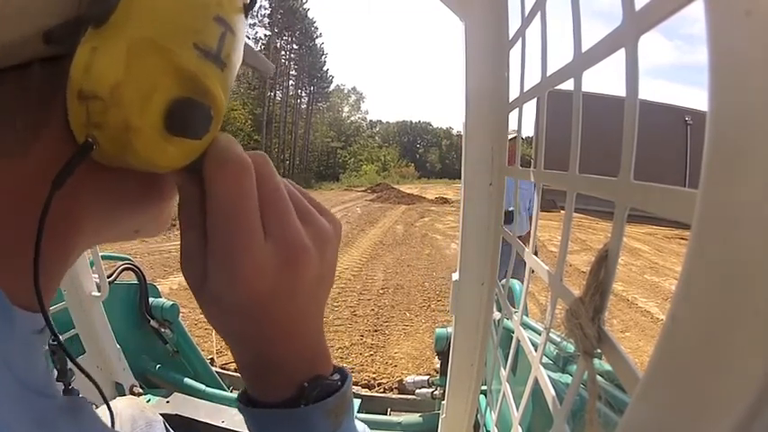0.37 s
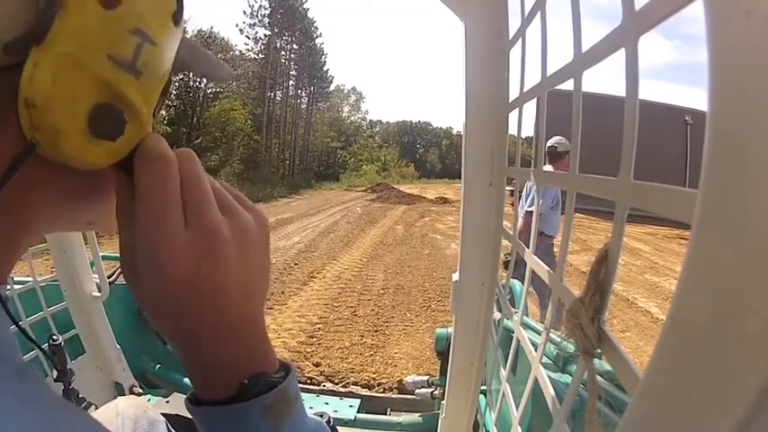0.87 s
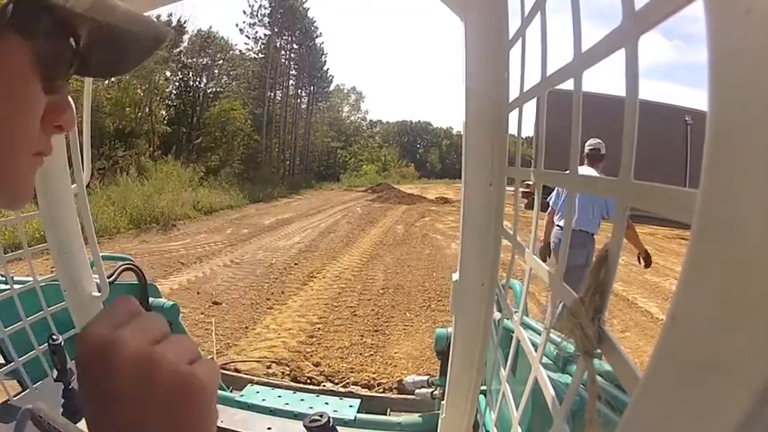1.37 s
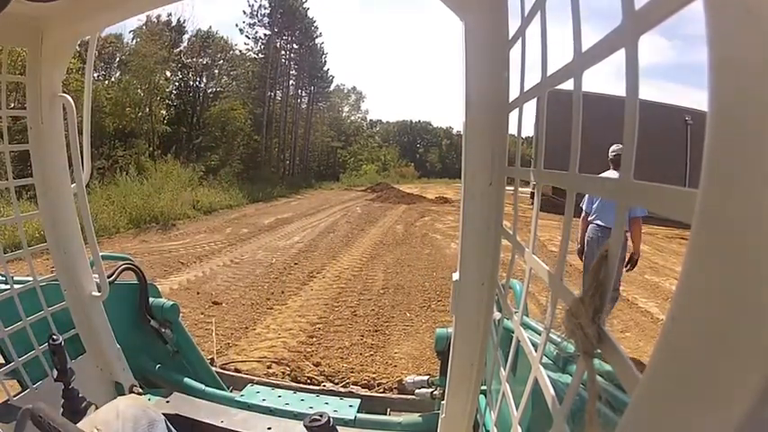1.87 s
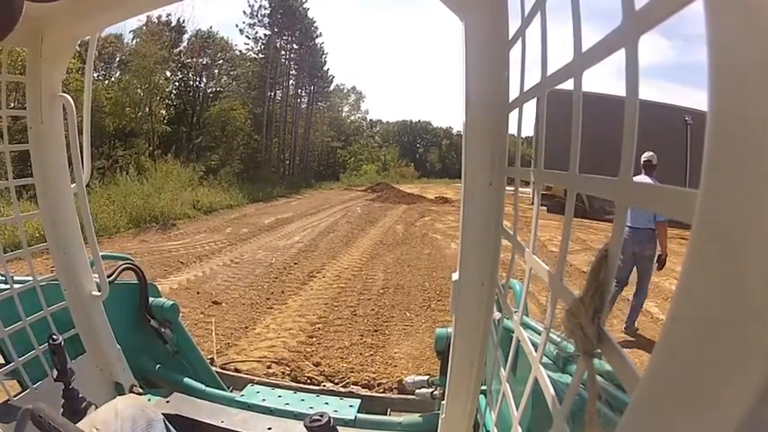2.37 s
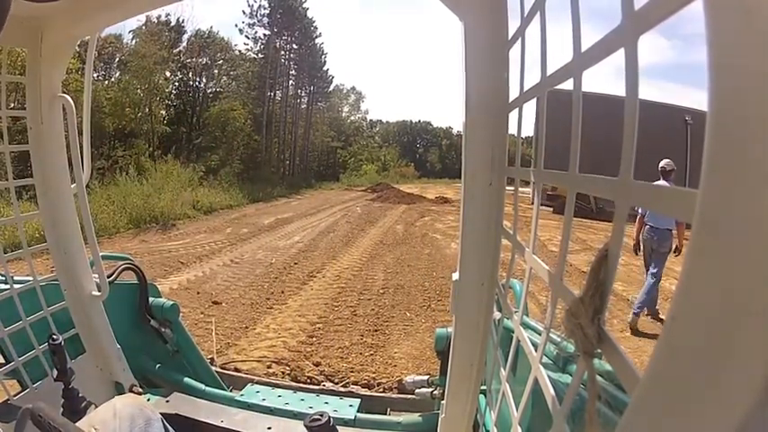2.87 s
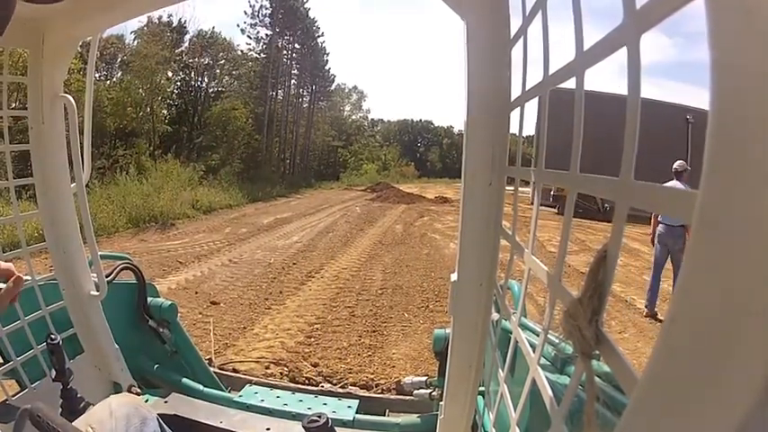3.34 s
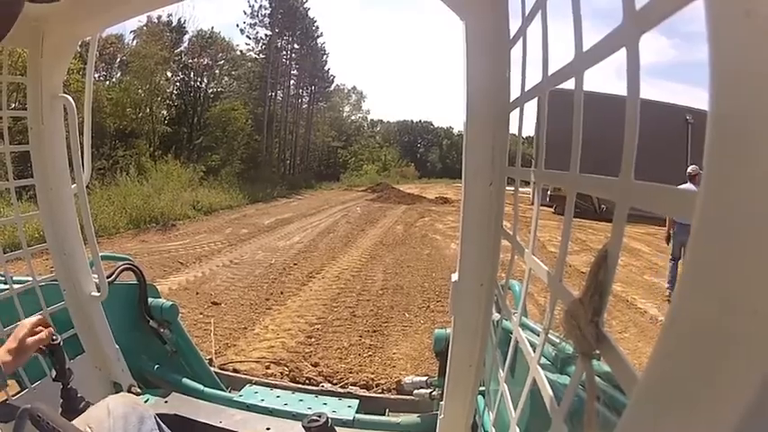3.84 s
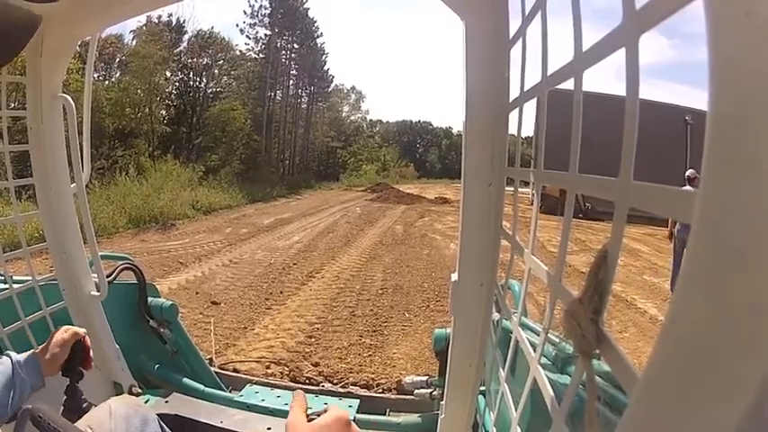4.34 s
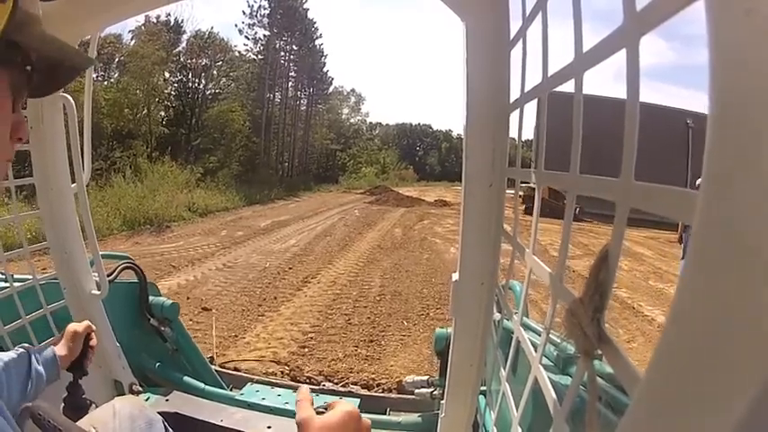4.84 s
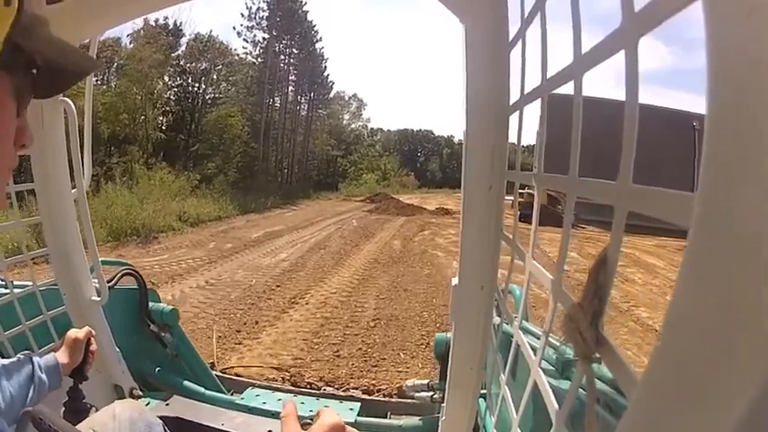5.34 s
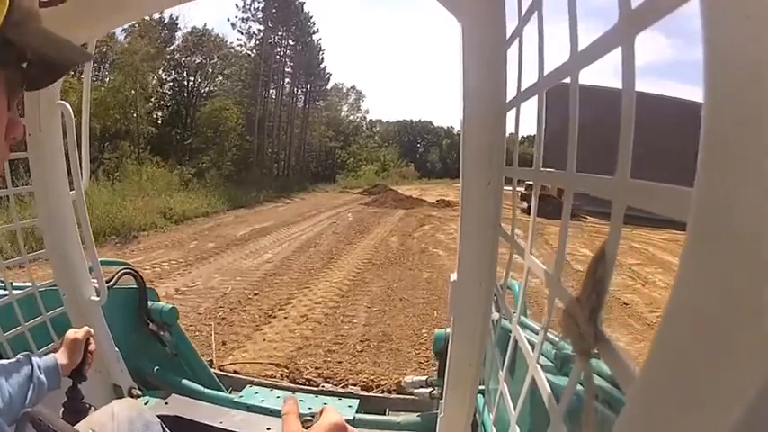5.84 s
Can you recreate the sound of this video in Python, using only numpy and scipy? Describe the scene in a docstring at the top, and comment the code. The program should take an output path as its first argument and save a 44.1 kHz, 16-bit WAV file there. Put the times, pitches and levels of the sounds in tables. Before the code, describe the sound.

Heard from the operator's shoulder inside an open, caged loader cab on a dirt site. From 0 to about 3.1 seconds a four-cylinder diesel idles evenly: a low lumpy throb around 36 firings a second, dry metallic block clatter, soft regular injector ticks and faintly humming panels; a tiny rattle comes near 2.6. At about 3.2 the throttle opens with a short hydraulic groan, and by 3.6 the engine is at working speed. A deep boom near 60 hertz dominates, fluttering, dipping around 3.9 and 4.15, then surging back. Thin pump whines appear from 4.4 to 5.2 as floor, roof and guards shudder. From about 5.1 the drive loads up: gritty knocks, a faint moan, more ringing steel and, after 5.5, a higher engine pitch, still roaring at the end near 6. The mono microphone overloads, the limiter ducks other sounds, and coarse hiss rides on top.

```python
"""Inside the open steel cab of a small tracked loader: a four-cylinder diesel idles, then is revved.
Crank orders shake the cab as sines; the firing rate climbs into the cab's boom, a gliding sine.
Filtered noise gives block clatter, injector ticks and ringing steel; pumps whine as gliding sines, and
scattered knocks sound the drive as it takes up load. A limiter holds the boom and ducks all else;
coarse sampling adds mirror copies of the bass that hiss in the treble."""
import sys
import numpy as np
from scipy import signal
from scipy.fft import rfft, irfft
from scipy.io import wavfile
from scipy.ndimage import uniform_filter1d

SR = 44100
rng = np.random.default_rng(int(sys.argv[2]) if len(sys.argv) > 2 else 0)


def log_audio(samples):
    """Write samples as a 16-bit WAV file to the path given in sys.argv[1]."""
    # one column per channel
    frames = np.atleast_2d(samples).T
    # limit to full scale, then quantise
    limited = np.clip(frames, -1, 1)
    pcm = np.round(limited * 32767).astype(np.int16)
    wavfile.write(sys.argv[1], SR, pcm)


def amplitude_ratio(level_db):
    """Convert a level in decibels to the matching linear amplitude (field) ratio."""
    exponent = np.asarray(level_db, float) / 20
    return 10 ** exponent


N = 262836
T = np.arange(N) / SR  # time in seconds


def level(x, db):
    """Normalization: scale a signal to an rms level in dB."""
    return x * amplitude_ratio(db) / np.sqrt(np.mean(x ** 2))


def noise():
    """White noise: equal power at all frequencies."""
    return rng.standard_normal(N)


def curve(table, column=1):
    """Linear interpolation: one column of a table over time."""
    rows = np.array(table, float)
    return np.interp(T, rows[:, 0], rows[:, column])


def colour(x, points):
    """Spectral shaping: gain between (Hz, dB) points on a log-frequency axis, -90 dB outside them."""
    hz, db = np.transpose(points)
    f = np.arange(N // 2 + 1) * SR / N + 1
    gain_db = np.interp(np.log(f), np.log(hz), db, -90, -90)
    return irfft(rfft(x) * amplitude_ratio(gain_db), N)


def ring(x, modes):
    """Modal resonance: the powers of the modes add; squaring each curve deepens the valleys between them."""
    f = np.arange(N // 2 + 1) * SR / N + 1
    power = sum(amplitude_ratio(2 * db) / (1 + ((f - hz * hz / f) / width) ** 2) ** 2 for hz, width, db in modes)
    return irfft(rfft(x) * np.sqrt(power), N)


def walk(rate):
    """Slow random modulation: levels held 1 / rate seconds, with slewed steps; spread near 1."""
    k = int(SR / rate)
    held = np.repeat(rng.standard_normal(N // k + 1), k)
    return uniform_filter1d(held, k)[:N]


def tone(hz, gain):
    """Frequency modulation: a sine whose phase is the running sum of its pitch; gain is rms."""
    return gain * np.sqrt(2) * np.sin(2 * np.pi * np.cumsum(hz) / SR)


def swell(start_s, hold_s, db, attack_s=0.026, release_s=0.067):
    """Amplitude envelope: a gain that rises, holds and falls away."""
    corners_s = [0, attack_s, attack_s + hold_s, attack_s + hold_s + release_s]
    return amplitude_ratio(db) * np.interp(T - start_s, corners_s, [0, 1, 1, 0])


# Engine speed. Each row: time in seconds, firing rate in Hz.
ENGINE_SPEED = [(0.0, 35.81), (3.17, 35.66), (3.3, 35.5), (3.45, 49.64), (3.65, 61.7), (3.85, 63.3),
                (4.15, 63.05), (4.45, 63.8), (4.8, 60.46), (5.2, 60.67), (5.5, 65.24), (5.7, 70.88),
                (5.96, 69.6)]


def crankshaft(first_tick_s=0.127):
    """Four-stroke kinematics: four firings make one cycle; cycle 0 falls on first_tick_s."""
    firing_hz = curve(ENGINE_SPEED)
    firings = np.cumsum(firing_hz) / SR - firing_hz[0] * first_tick_s
    return firing_hz, firings / 4


# Idle crank orders. Each row: multiple of the four-stroke cycle rate, rms level in dB before it wavers.
IDLE_LINES = [(4, -21.5), (5, -64), (6, -36), (7, -13.5), (8, -25), (9, -33), (10, -33.5), (11, -29),
              (12, -28.5), (16, -21.5), (19, -47), (20, -16), (24, -35.5), (27, -65), (28, -32),
              (29, -30.5), (30, -32), (31, -69), (32, -46), (40, -35.5), (44, -41), (46, -46.5),
              (52, -46.5), (58, -49.5), (60, -43.5)]


def idle_lines(cycle, idle, lag=.3, spread=.013):
    """Harmonic excitation: steady crank orders are sines locked to the cycle, phases varying with order."""
    total = 0
    for k, db in IDLE_LINES:
        phase = k * (cycle - lag) + spread * k * k
        total = total + np.sqrt(2) * amplitude_ratio(db + 1.85 * walk(1.41)) * np.sin(2 * np.pi * phase)
    return idle * total


# The boom's course. Each row: time in seconds, pitch in Hz, rms level in dB before dropouts and limiter.
BOOM_COURSE = [(3.17, 63.16, -33), (3.23, 59.5, -14), (3.29, 54.2, -26), (3.33, 53.87, -2),
               (3.355, 53.7, 7), (3.55, 57.2, 5), (3.73, 61.65, 4.5), (3.81, 62.4, -2), (3.88, 61.85, -4),
               (3.94, 61.73, -4), (4.03, 62.3, 6.5), (4.08, 61.3, -3), (4.15, 60.17, -15),
               (4.25, 60.02, 3.5), (4.33, 62.43, 2), (4.39, 64.4, -8), (4.5, 61.6, 3), (4.62, 61.36, -0.5),
               (4.87, 60.7, 0), (5.14, 60.17, 1), (5.24, 59.6, 1.5), (5.55, 59.36, 2.5), (5.7, 60.6, -0.5),
               (5.8, 60.9, -1), (5.96, 57.1, 0.5)]
# Brief dropouts of the boom. Each row: time of the centre in seconds, depth in dB.
BOOM_DROPOUTS = [(3.39, -4), (3.85, -21), (3.91, -11), (4.37, -12), (4.53, -5), (4.61, -8), (4.77, -5),
                 (5.48, -5.5), (5.62, -12), (5.74, -14), (5.85, -24)]


def boom(work, dropout_s=0.015):
    """Cavity excitation: the firing drives the cab air in one tone, which now and then drops out."""
    lost_db = sum(db * np.exp(-((T - s) / dropout_s) ** 2) for s, db in BOOM_DROPOUTS)
    return tone(curve(BOOM_COURSE), work * amplitude_ratio(curve(BOOM_COURSE, column=2) + lost_db))


# Broad spectrum of the clatter. Each row: frequency in Hz, relative gain in dB.
CLATTER_SPECTRUM = [(500, -19), (700, -8.5), (1200, -0.5), (1700, 1.5), (2500, -11), (2800, -24),
                    (3600, -14), (4400, -24.5), (5300, -20), (5700, -30), (5950, -20.5)]
# Resonances of the engine block. Each row: frequency in Hz, width in Hz, relative gain in dB.
BLOCK_MODES = [(715, 14.8, 4.5), (807, 17, 5), (890, 290, -7.5), (1084, 44, -1), (1216, 71, 0),
               (1407, 18, 2), (1475, 16, 9.5), (1651, 39, -1.5), (1860, 31, -1), (2060, 200, -6.5),
               (2270, 91, 1.5), (2428, 340, -6), (2956, 82, -10), (3020, 56, -6), (3520, 63, -14)]


def clatter(cycle, work, repeat=0.38, gate=0.072, modes_db=-1.5, flicker_db=0.84, hiss_drop_db=2):
    """Impact excitation: valves and pistons knock the block, partly alike each cycle, swelling at firings."""
    pattern = rng.standard_normal(2048)
    same = pattern[(cycle % 1 * len(pattern)).astype(int)]
    knocks = repeat * same + (1 - repeat) * noise()
    knocks = knocks * (1 + gate * np.cos(2 * np.pi * (4 * cycle - .1)))
    knocks = knocks * amplitude_ratio(flicker_db * walk(30))
    # at working speed the hiss drops against the block modes
    hiss = amplitude_ratio(-hiss_drop_db * work) * level(colour(knocks, CLATTER_SPECTRUM), 0)
    modes = level(ring(knocks, BLOCK_MODES), modes_db)
    return level(hiss + modes, 0)


# Spectrum of an injector tick. Each row: frequency in Hz, relative gain in dB.
TICK_SPECTRUM = [(2500, -5), (3200, 1), (4000, -3.5), (5200, -7), (5700, -1.5), (5950, -18)]


def ticks(cycle, firing_hz, decay_s=0.015, second_db=-10, fresh=0.6):
    """Periodic impulses: one injector ticks each cycle, its partner more softly half a cycle on."""
    turn = np.floor(2 * cycle).astype(int)  # half cycles
    # + 4 keeps the index positive before the first tick
    size = amplitude_ratio(1.2 * rng.standard_normal(400)[turn + 4] + second_db * (turn % 2))
    since_s = (2 * cycle % 1) * 2 / firing_hz
    # a common shape makes the ticks much alike
    alike = rng.standard_normal(4000)[(since_s * SR).astype(int)]
    bursts = size * np.exp(-since_s / decay_s) * (alike + fresh * noise())
    return level(colour(bursts, TICK_SPECTRUM), 0)


def rattle(start_s, length_s, db):
    """Transient noise: one burst in the colour of the ticks."""
    corners_s = [0, .002, length_s, length_s + 0.012]
    gain = amplitude_ratio(db) * np.interp(T - start_s, corners_s, [0, 1, 1, 0])
    return gain * level(colour(noise(), TICK_SPECTRUM), 0)


# Gear and pump lines. Each row: multiple of the cycle rate, peak level in dB over the block's shaking
# before it wavers.
GEAR_LINES = [(16, -5.5), (36, -6.5), (40, -11), (60, -9), (64, -12.5), (80, -19), (100, -7.5)]


def gear_lines(cycle, firing_hz, governed_hz=63.05, width_hz=1.13):
    """Order tracking: gear and pump lines follow the crank and stand out near the governed speed."""
    steady = np.exp(-((firing_hz - governed_hz) / width_hz) ** 2)
    total = 0
    for k, db in GEAR_LINES:
        gain = amplitude_ratio(db + 2.2 * walk(3.92))
        total = total + gain * np.sin(2 * np.pi * k * cycle + 0.71 * walk(15))
    return steady * total


# Shaking of block, side panels, floor plate, roof, guards, in that order. Each row: idle level in dB,
# working level in dB, rise in dB at full load.
SHAKING_LEVELS = [(-28, -24, 2.5), (-24.5, -20, 9), (-30, -18, 1.5), (-33.5, -26, 14), (-32.5, -28, 5.5)]


def shaking(load):
    """Forced vibration: the gain of each part changes from idle to working speed and rises with load."""
    rev_up = np.interp(T, (3.08, 3.2), [0, 1])
    return [amplitude_ratio(idle_db + (work_db - idle_db) * rev_up + load_db * load)
            for idle_db, work_db, load_db in SHAKING_LEVELS]


# Resonances of side panels, floor plate, roof and guards. Each row: frequency in Hz, width in Hz,
# relative gain in dB.
PANEL_MODES = [(245.2, 17, -2), (265.4, 12.3, 1), (284, 25, -10), (309.4, 14.4, -10.5)]
FLOOR_MODES = [(100.7, 12.6, -5), (106.2, 2.6, 1.5), (131.2, 18, -15)]
ROOF_MODES = [(142, 10, -2.5), (171, 11.6, -0.5), (188.3, 9.1, -4.5), (202.3, 7.4, 1), (213.3, 15, 0.5)]
GUARD_MODES = [(362, 77, -7), (410, 36, -4), (467, 41, -1), (520, 69, -1.5), (563.6, 15, 2.5),
               (612, 25, -5.5)]
# Jolts through the floor plate. Each row: start in seconds, hold in seconds, added level in dB before wander.
FLOOR_JOLTS = [(3.208, 0.13, -14.5), (3.806, .12, -23), (4.465, 0.17, -11.5), (5.104, 0.12, -14.5),
               (5.488, 0.16, -8), (5.765, 0.05, -14.5)]


def cab_steel(panels, floor, roof, guards, work, wander_db=2.5, wander_per_s=12):
    """Modal vibration: random shaking rings each steel part, wandering at work; jolts add to the floor."""
    floor = floor + sum(swell(*jolt) for jolt in FLOOR_JOLTS)
    parts = [(panels, PANEL_MODES), (floor, FLOOR_MODES), (roof, ROOF_MODES), (guards, GUARD_MODES)]
    total = 0
    for shake, modes in parts:
        wander = amplitude_ratio(wander_db * work * walk(wander_per_s))
        total = total + shake * wander * level(ring(noise(), modes), 0)
    return total


# Hydraulic whines and groans as throttle and levers move, and a hum of the floor plate near 100 Hz. Each row: #
# start in seconds, hold in seconds, first pitch in Hz, settled pitch in Hz, rms level in dB before sag and
# flicker.
WHINES_AND_HUMS = [(3.225, 0.1, 81.9, 74.4, -9), (4.375, .08, 75.9, 75, -25), (4.418, 0.038, 473, 475, -21.5),
                   (4.515, 0.32, 557, 551.2, -17.5), (4.76, 0.29, 834, 810, -30), (5.098, .12, 807, 796, -25.5),
                   (3.303, 0.79, 101.7, 99.74, -7), (3.829, .08, 250.2, 255.3, -16.5)]


def whine(start_s, hold_s, first_hz, settled_hz, db, settle_share=0.37, sag_db_per_s=-9):
    """Exponential relaxation: a tone glides to its settled pitch and sags in level."""
    since_s = np.maximum(T - start_s, 0)
    glide = np.exp(-since_s / (settle_share * hold_s))
    hz = settled_hz + (first_hz - settled_hz) * glide
    return tone(hz, amplitude_ratio(sag_db_per_s * since_s) * swell(start_s, hold_s, db))


def whines_and_hums():
    """Amplitude modulation: the level of each whine, groan and hum flickers."""
    return sum(amplitude_ratio(1.0 * walk(25)) * whine(*row) for row in WHINES_AND_HUMS)


# Bursts of effort. Each row: start in seconds, hold in seconds, grit level in dB,
# added block clatter gain in dB.
EFFORT_BURSTS = [(3.16, 0.093, -43, -39), (5.113, 0.022, -20, -28), (5.31, .04, -31, -34),
                 (5.47, 0.053, -25, -32), (5.75, 0.037, -25, -24.5), (5.82, 0.065, -21.5, -23),
                 (5.92, .04, -16, -26)]


def effort_bursts(column):
    """Superposition: the gains of all bursts add; column 2 is the grit, 3 the block clatter."""
    return sum(swell(row[0], row[1], row[column]) for row in EFFORT_BURSTS)


# Load on the drive. Each row: time in seconds, share of full load from 0 to 1.
DRIVE_LOAD = [(4.36, 0.16), (4.45, 0.33), (5.05, 0.6), (5.45, 0.93), (5.6, 0.95), (5.96, 1)]


def drive_load():
    """Load curve: the drive takes up its share of full load in ramps."""
    return curve(DRIVE_LOAD)


# Frame resonances heard as grit. Each row: frequency in Hz, width in Hz, relative gain in dB.
GRIT_MODES = [(670, 150, 2.5), (872, 44, 3.5), (1044, 150, -3.5), (1480, 150, 4), (1994, 160, -1)]
# Moans of the drive. Each row: start in seconds, hold in seconds, first pitch in Hz, settled pitch in Hz,
# rms level in dB before sag and breaking.
DRIVE_MOANS = [(5.51, .42, 770, 698, -31)]


def drive(load, grains_hz=1200, spread_db=2, break_db=5, grit_db=-25, grit_start_s=5.04):
    """Shot noise: scattered small knocks ring the frame while the moan comes and goes."""
    chance = rng.random((2, N))
    hits = chance[0] < grains_hz / SR
    sizes = amplitude_ratio(-spread_db * np.log(chance[1] + 1e-9))
    grains = hits * sizes * np.sign(noise())
    strength = load * swell(grit_start_s, N / SR, grit_db) + effort_bursts(2)
    grit = strength * level(ring(grains, GRIT_MODES), 0)
    return grit + amplitude_ratio(break_db * walk(40)) * sum(whine(*row) for row in DRIVE_MOANS)


# Resonances of the cab air. Each row: frequency in Hz, width in Hz, relative gain in dB.
AIR_MODES = [(59.5, 4.1, 2.5), (56.4, 5.5, -24), (75, 16.6, -2.5), (45, 6, -47)]


def cab_air(work, idle_db=-18.0, work_rise_db=6):
    """Cavity resonance: noise rumbles in the cab's air modes, louder at work."""
    return amplitude_ratio(work_rise_db * work) * level(ring(noise(), AIR_MODES), idle_db)


def scene():
    """Superposition: engine, cab and pumps add at the driver's shoulder."""
    firing_hz, cycle = crankshaft()
    work = np.interp(T, (3.12, 3.26), [0, 1])  # the throttle opens
    load = drive_load()
    block, *steel = shaking(load)
    out = block * gear_lines(cycle, firing_hz)
    out = out + idle_lines(cycle, 1 - work) + boom(work) + whines_and_hums() + drive(load)
    out = out + (block + effort_bursts(3)) * amplitude_ratio(0.27) * clatter(cycle, work)
    out = out + block * amplitude_ratio(-16.5 - 5.2 * work) * ticks(cycle, firing_hz)
    out = out + rattle(start_s=2.586, length_s=.02, db=-40)
    out = out + cab_steel(*steel, work) + cab_air(work)
    return out[None]


def limiter(x, rate, limit=1, attack_s=.005, release_db_per_s=56):
    """Gain control: follows peaks up fast and down at a steady slope, turning down what passes the limit."""
    fall_db = release_db_per_s * np.arange(x.shape[1]) / rate
    peak_db = 20 * np.log10(np.abs(x) / limit + 1e-9)
    over_db = np.maximum.accumulate(peak_db + fall_db, axis=1) - fall_db
    keep = np.exp(-1 / (attack_s * rate))
    cut_db = signal.lfilter([1 - keep], [1, -keep], np.maximum(over_db, 0), axis=1)
    return x * amplitude_ratio(-cut_db)


def top_cut(x):
    """Nothing passes above the cut-off."""
    return signal.sosfilt(signal.butter(12, 15770, fs=SR, output="sos"), x)


def record(dry, ceiling=.965, knee=8.):
    """Zero-order hold: sampled at 12 kHz, limited, rounded at full scale and held, the bass is mirrored."""
    coarse = signal.resample_poly(dry, 40, 147, axis=1)
    coarse = limiter(coarse, 12000)
    coarse = coarse / (1 + np.abs(coarse / ceiling) ** knee) ** (1 / knee)
    # each sample held four times: the spectrum mirrors about 12 kHz
    held = np.repeat(coarse, 4, axis=1)
    mix = signal.resample_poly(held, 147, 160, axis=1)[:, :N]
    return top_cut(mix)


dry = scene()
out = record(dry)
log_audio(out)
```